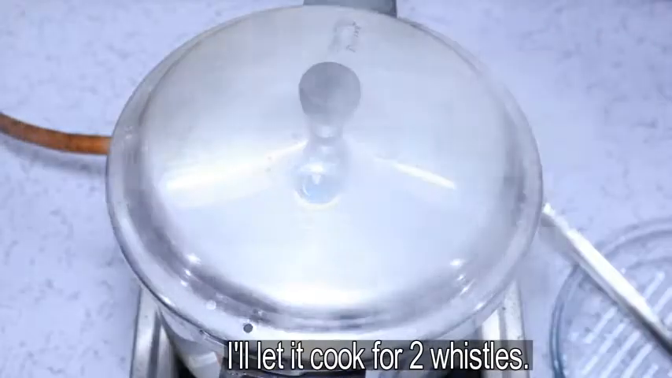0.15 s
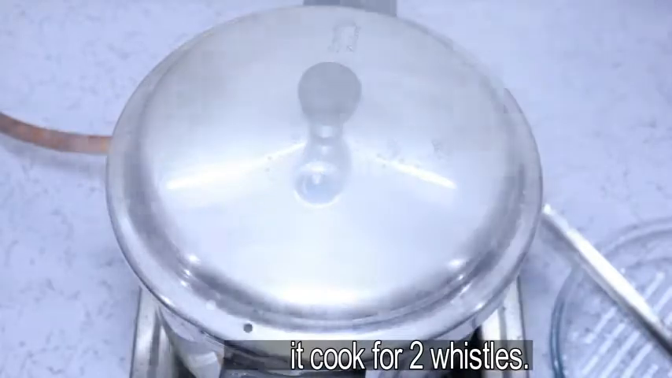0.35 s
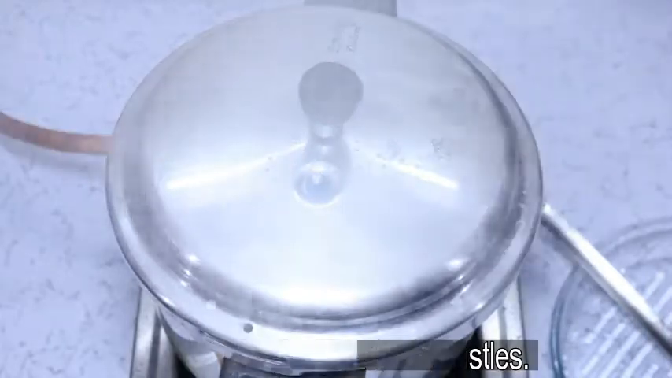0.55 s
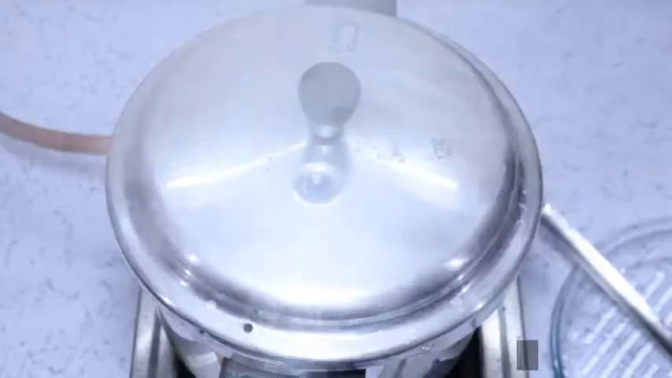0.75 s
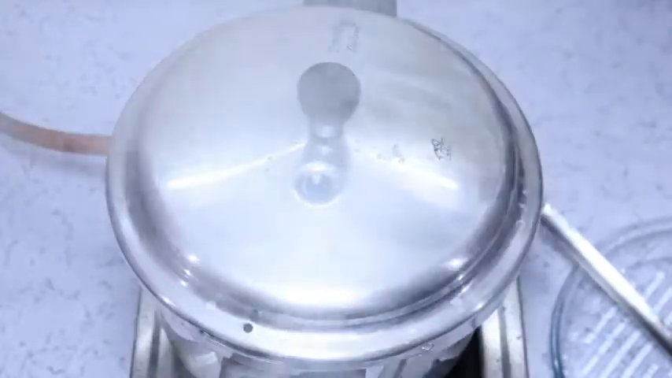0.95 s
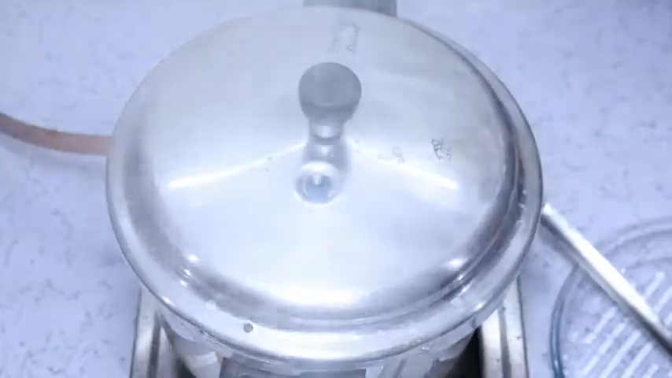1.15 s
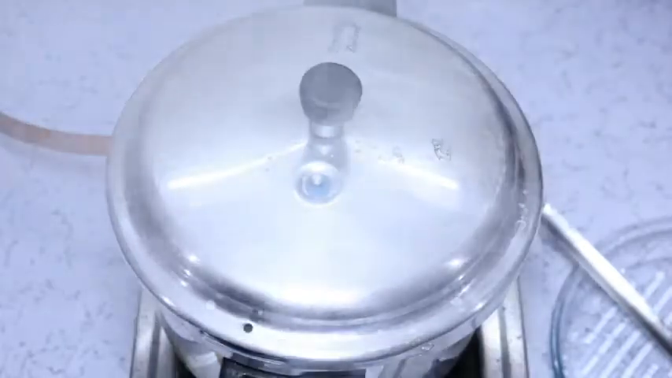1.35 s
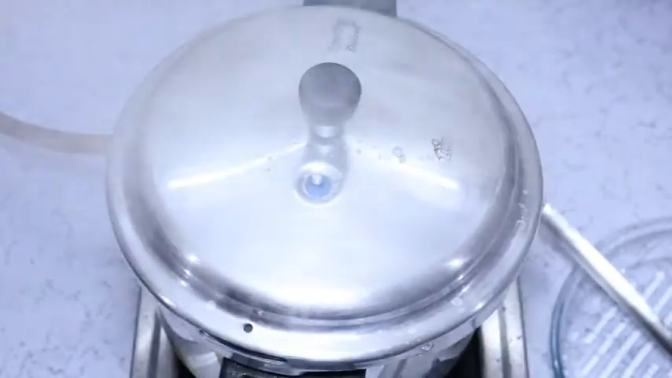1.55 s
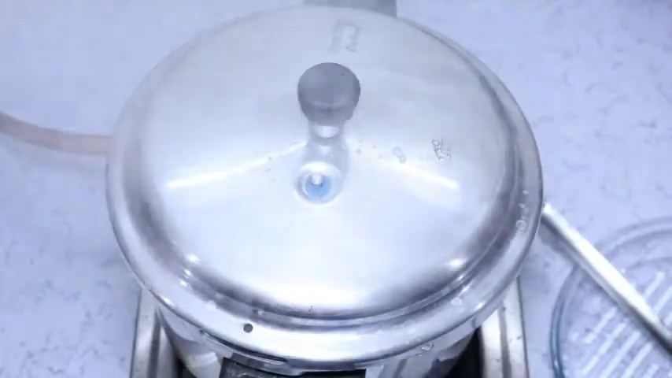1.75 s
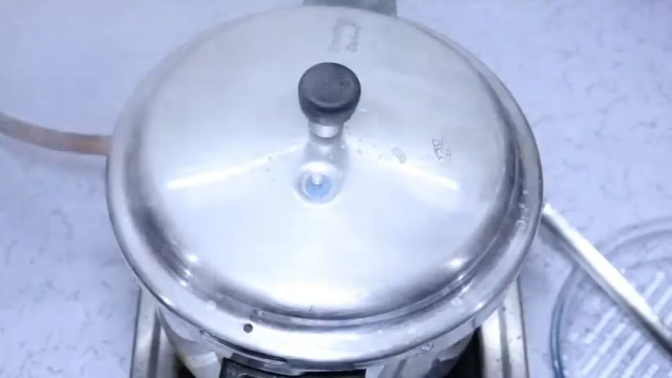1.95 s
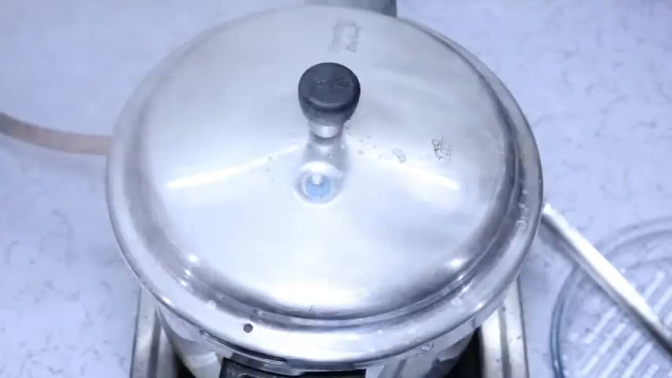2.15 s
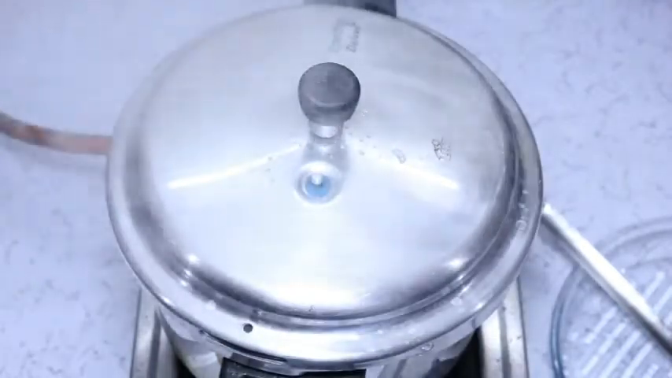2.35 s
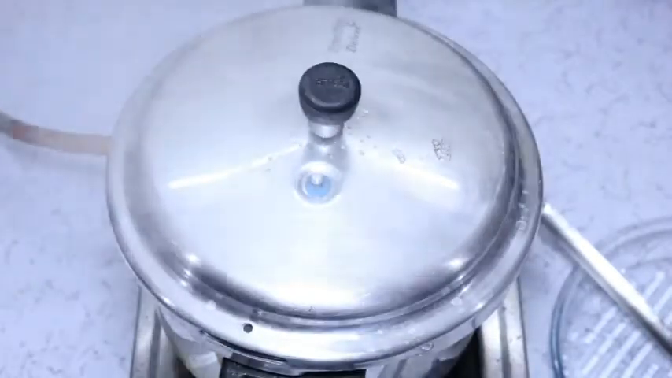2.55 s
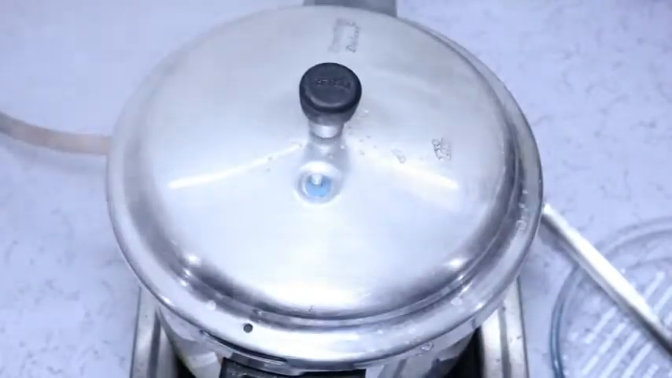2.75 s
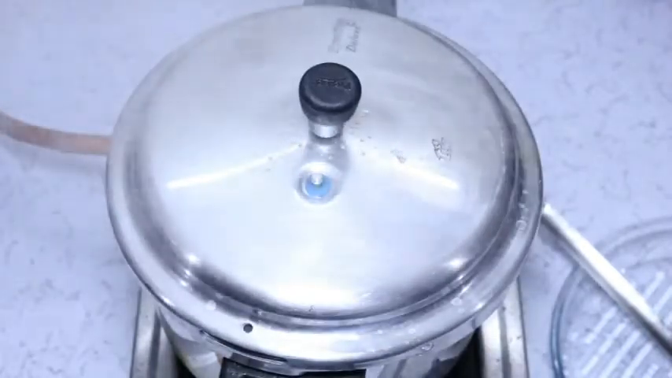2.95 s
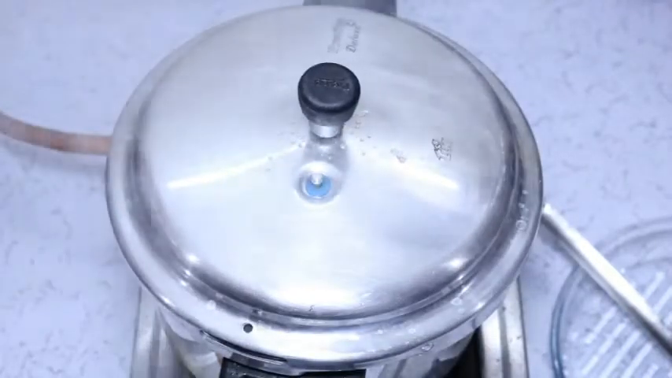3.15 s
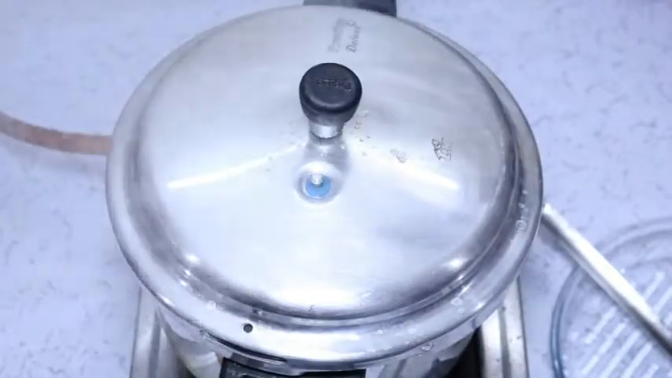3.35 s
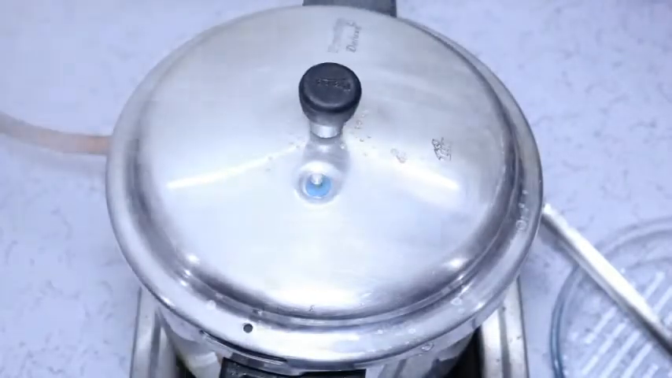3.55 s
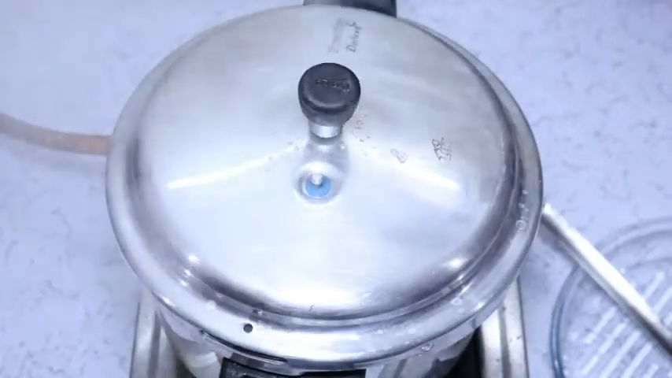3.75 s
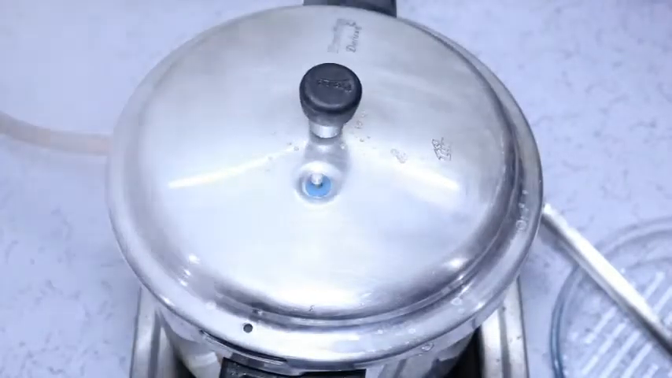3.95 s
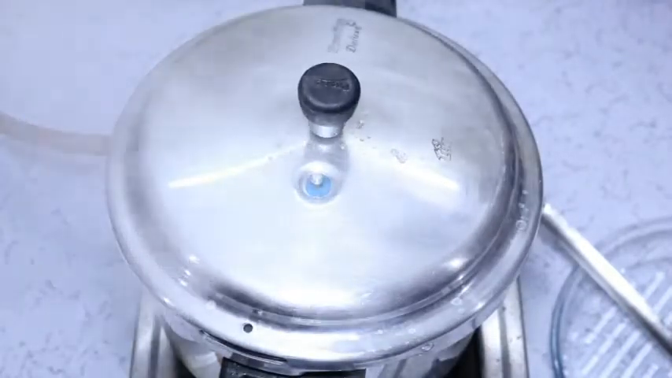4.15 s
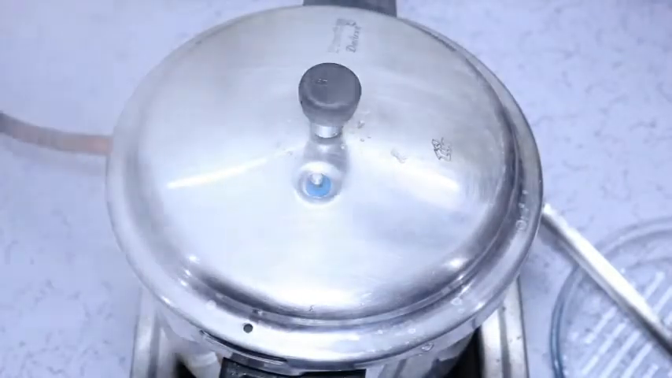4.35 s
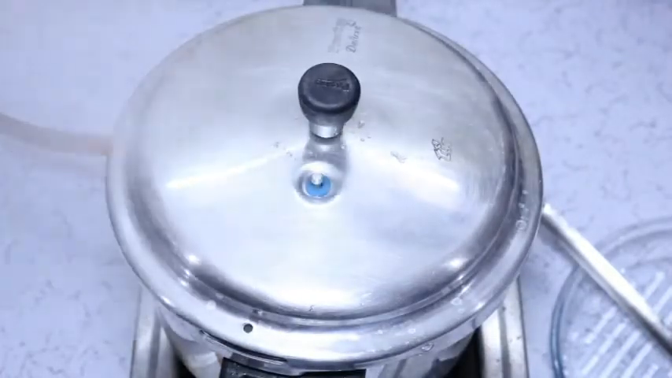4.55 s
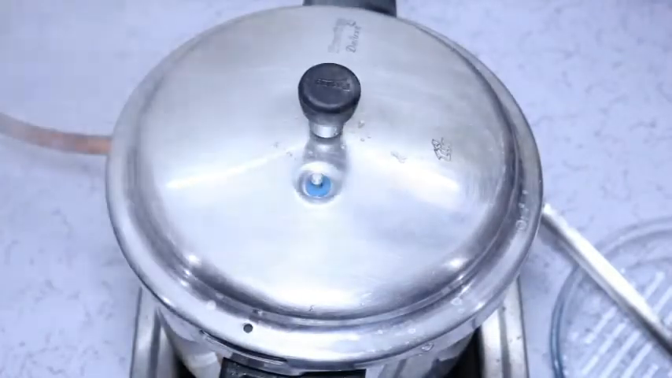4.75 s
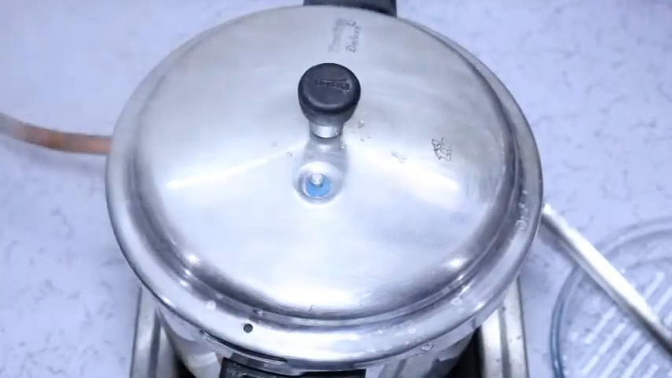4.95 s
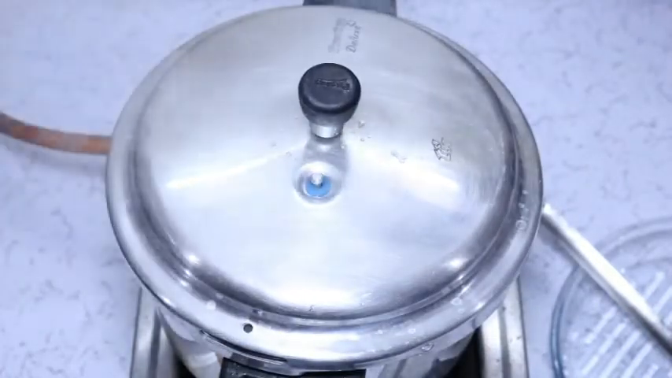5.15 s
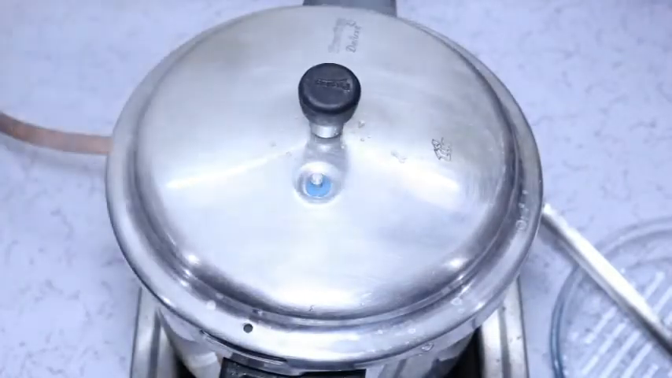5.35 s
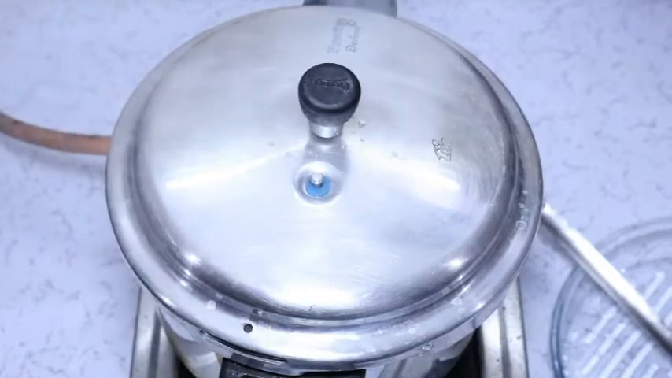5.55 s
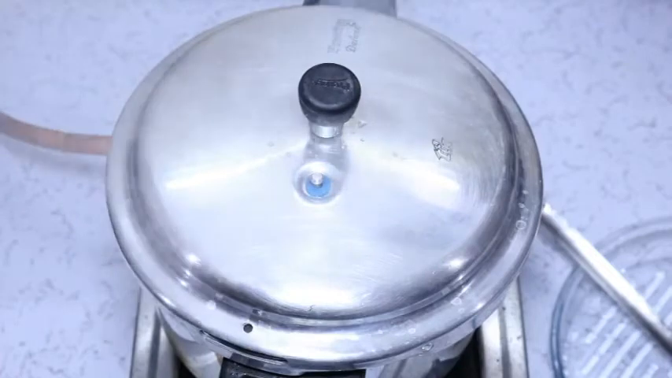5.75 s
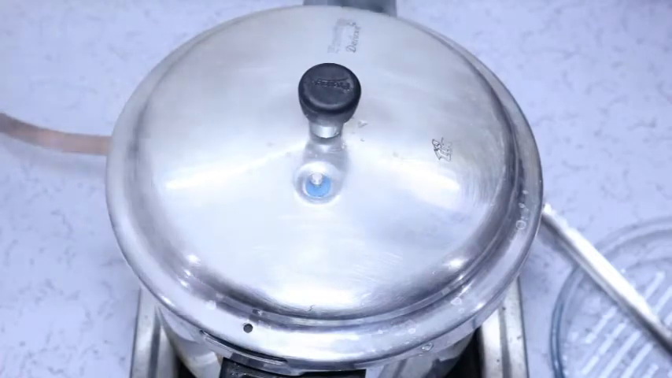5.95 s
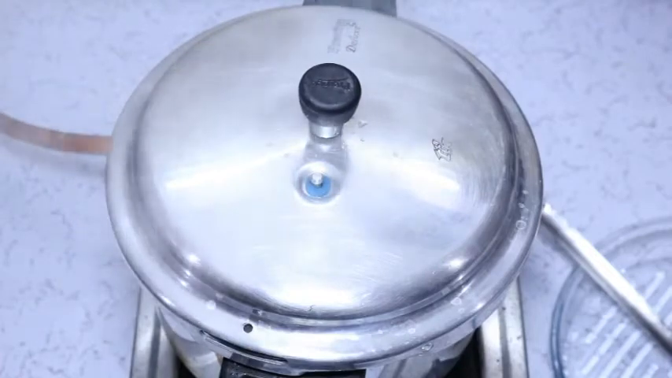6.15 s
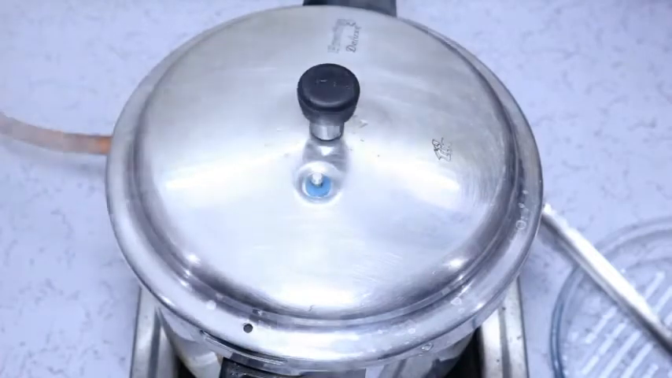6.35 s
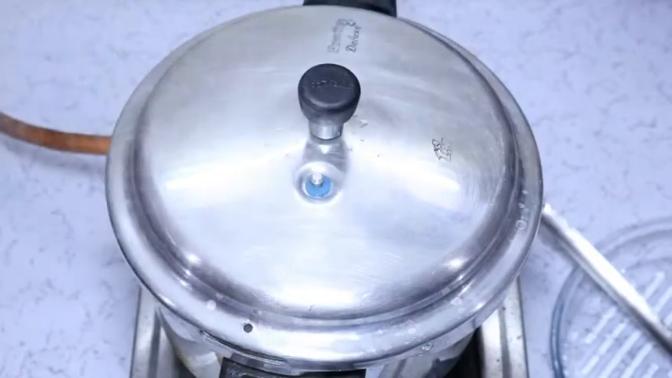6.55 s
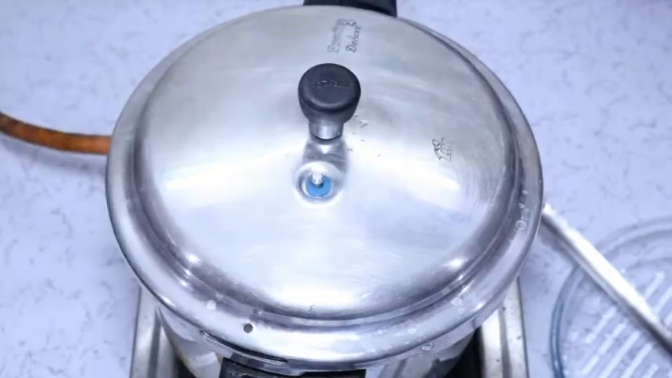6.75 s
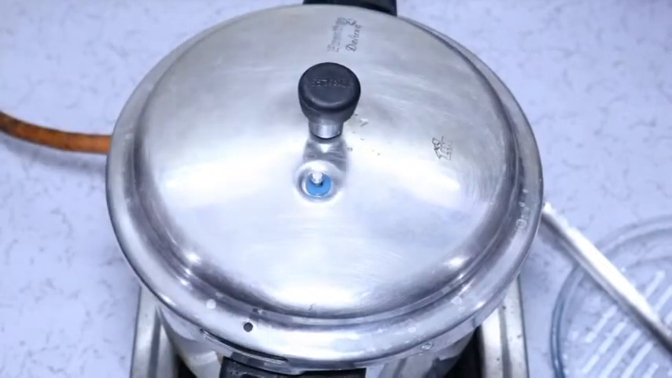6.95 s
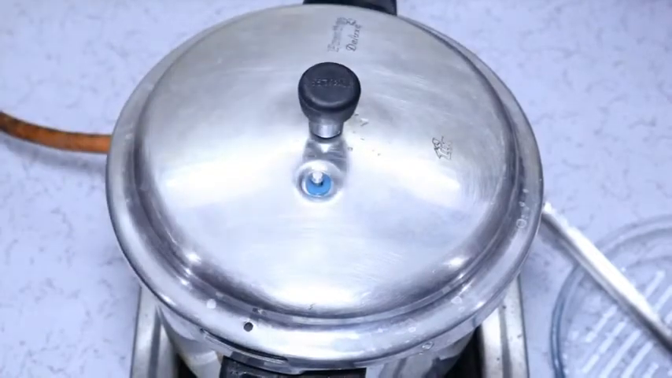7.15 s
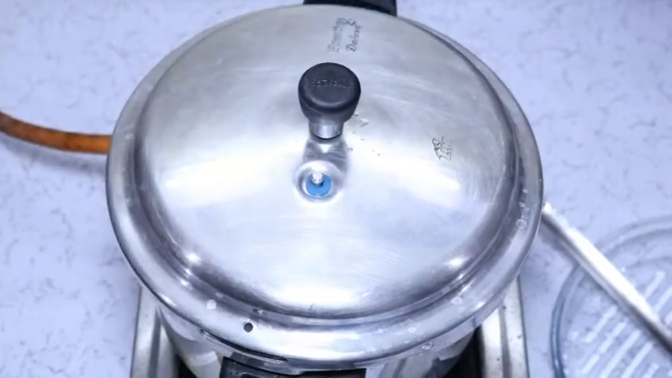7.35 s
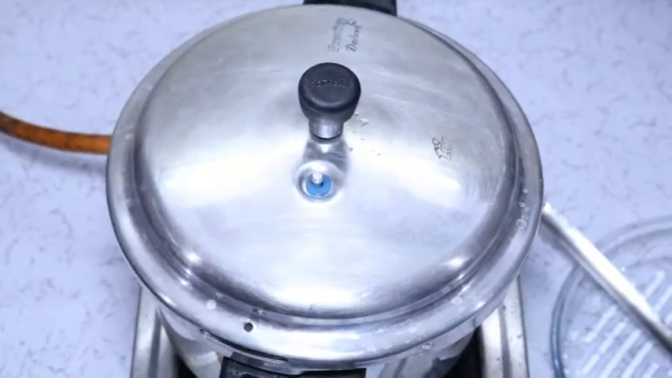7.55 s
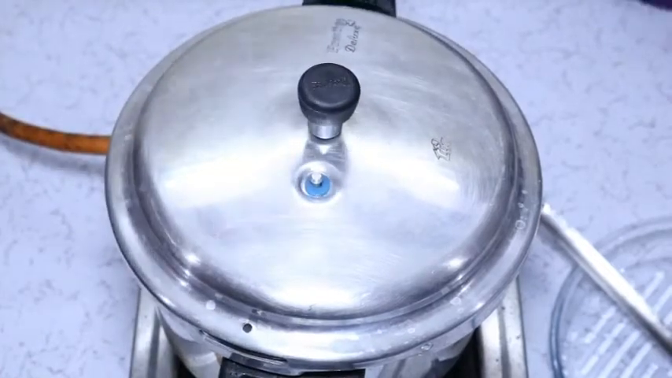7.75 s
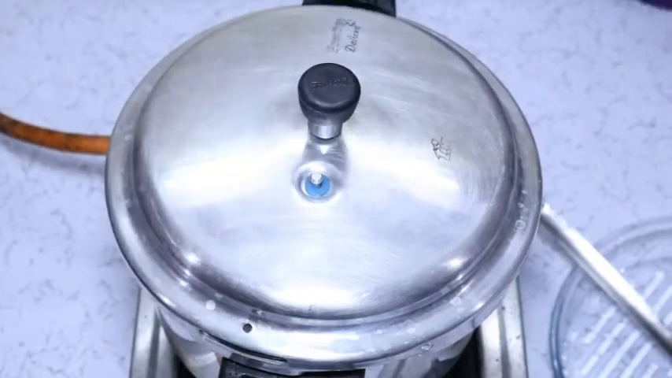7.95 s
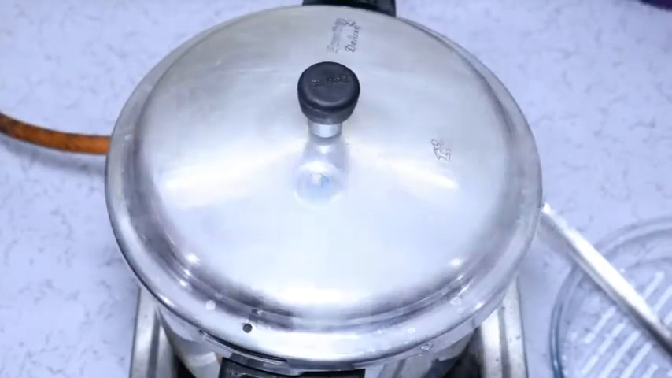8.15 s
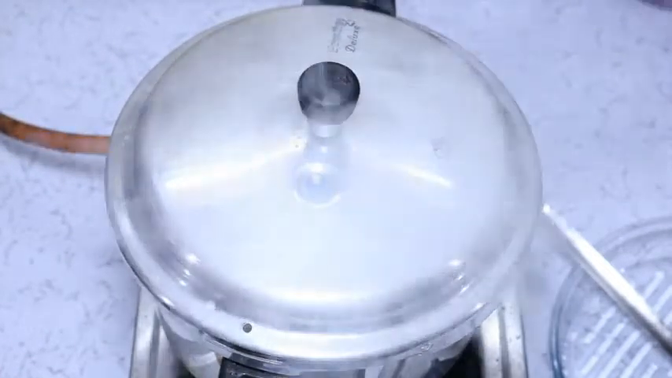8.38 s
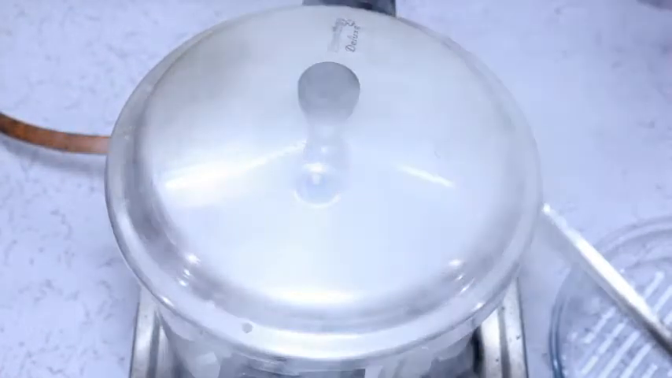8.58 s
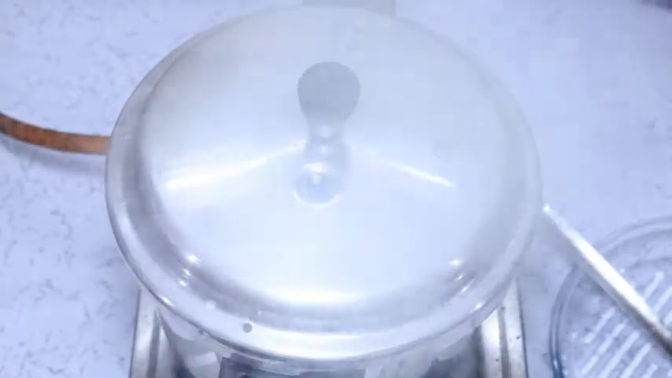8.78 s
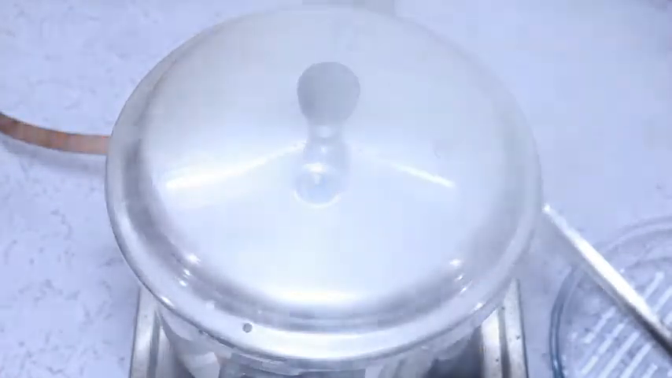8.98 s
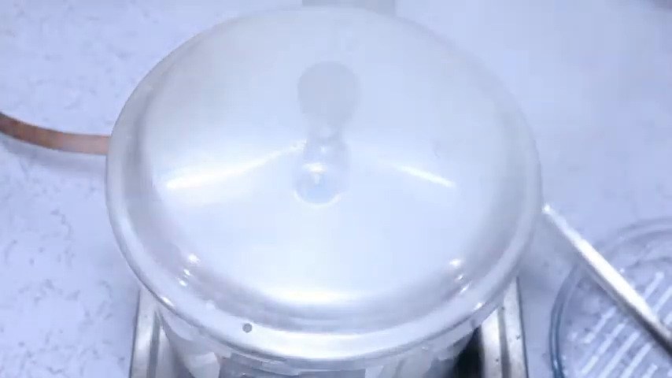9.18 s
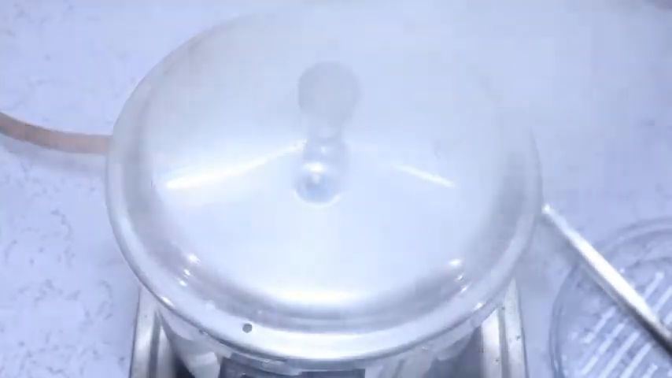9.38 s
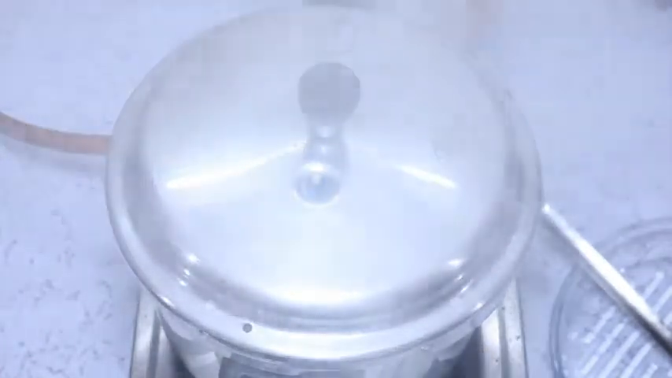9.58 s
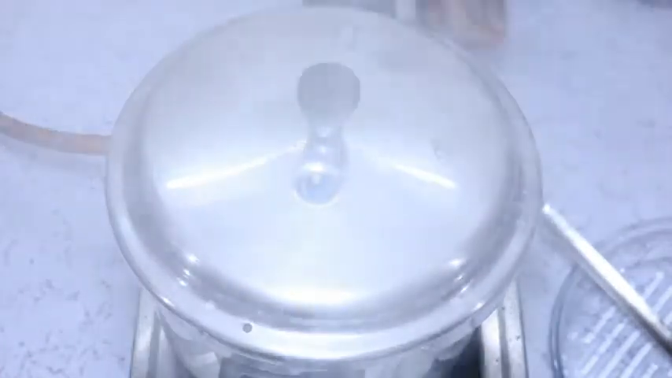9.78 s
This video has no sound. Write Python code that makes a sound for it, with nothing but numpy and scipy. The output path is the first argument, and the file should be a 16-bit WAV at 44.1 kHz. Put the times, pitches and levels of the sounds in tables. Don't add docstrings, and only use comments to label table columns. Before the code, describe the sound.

Pressure cooker steam blasts loudly and unevenly over a faint fan hum, rattles shut to a thin seep, then after a brief silence blasts again.

```python
import sys
import numpy as np
from scipy import signal
from scipy.fft import rfft, irfft, next_fast_len
from scipy.io import wavfile
from scipy.ndimage import uniform_filter1d

SR = 44100
rng = np.random.default_rng(int(sys.argv[2]) if len(sys.argv) > 2 else 0)


def magnitude_from_level(level_db):
    exponent = np.asarray(level_db, float) / 20
    return 10 ** exponent


def log_audio(samples):
    frames = np.atleast_2d(samples).T
    limited = np.clip(frames, -1, 1)
    pcm = np.round(limited * 32767).astype(np.int16)
    wavfile.write(sys.argv[1], SR, pcm)


N = 433062
TIME = np.arange(N) / SR
SIZE = next_fast_len(N)
HZ = np.maximum(np.fft.rfftfreq(SIZE, 1 / SR), 1)


def rms_one(x):
    return x / np.sqrt(np.mean(x ** 2) + 1e-20)


def at_hz(points):
    hz, db = np.array(points).T
    return np.interp(np.log(HZ), np.log(hz), db)


def drift(rate_hz):
    step = 40
    r = np.exp(-2 * np.pi * rate_hz * step / SR)
    noise = rng.standard_normal(N // step + 2002)
    slow = signal.lfilter([1], [1, -2 * r, r * r], noise)[2000:]
    return np.interp(np.arange(N) / step, np.arange(len(slow)), rms_one(slow))


# frequency in Hz, level in dB rms, wander in dB.
FAN_HUM = [(63.8, -70, 4), (127.7, -54, 1.2), (160, -60.5, 0.5), (245, -71, 1.5)]
# frequency in Hz, density in dB per Hz.
FAN_RUMBLE = [(25, -13), (60, -21), (100, -5), (125, -1), (165, 0), (200, -13.5), (300, -13), (500, -31)]


def fan():
    hum = np.zeros(N)
    for hz, db, wander_db in FAN_HUM:
        level = np.sqrt(2) * magnitude_from_level(db + wander_db * drift(2.2))
        hum += level * np.sin(2 * np.pi * hz * TIME + 0.3 * drift(1.7))
    spectrum = rfft(rng.standard_normal(SIZE)) * magnitude_from_level(at_hz(FAN_RUMBLE)) * (HZ < 600)
    return hum + magnitude_from_level(-56.5) * rms_one(irfft(spectrum, SIZE)[:N])


def strike(hits, modes, rub_s):
    at_s, peak_db = np.transpose(hits)
    spread_db = rng.normal(0, 2.6, (len(hits), len(modes)))
    out, grit = np.zeros(N), rng.standard_normal(N)
    contact = np.hanning(int(rub_s * SR) + 3)
    contact /= np.sqrt(np.sum(contact ** 2))
    heard = slice(int((at_s.min() - 0.1) * SR), int((at_s.max() + 0.5) * SR))
    for k, (hz, level_db, t60_s) in enumerate(modes):
        clicks = np.zeros(N)
        clicks[(at_s * SR).astype(int)] = magnitude_from_level(peak_db + level_db + spread_db[:, k])
        rub = signal.oaconvolve(clicks[heard], contact, "same") * grit[heard] + 1e-18
        r, w = magnitude_from_level(-60 / (t60_s * SR)), 2 * np.pi * hz / SR
        out[heard] += signal.lfilter([0.5, 0, -0.5], [1, -2 * r * np.cos(w), r * r], rub)
    return out


# centre in seconds, peak in dB.
BUMP_HITS = [
    (4.9, -40),
    (4.925, -38.5),
    (4.95, -48),
    (4.99, -50),
]
# frequency in Hz, level in dB, t60 in seconds.
CUPBOARD_MODES = [(326, -2, 0.26), (349, -5, .15), (431, 2, 0.17), (522, -4, 0.12), (650, 1, .1)]


def cupboard_bump():
    return strike(BUMP_HITS, CUPBOARD_MODES, rub_s=0.039)


# centre in seconds, peak in dB.
RATTLE_HITS = [(6.296, -39), (6.318, -33), (6.344, -30), (6.362, -34), (6.377, -33), (6.397, -32),
               (6.41, -37), (6.424, -35), (6.439, -40), (6.452, -47), (6.479, -41)]
# frequency in Hz, level in dB, t60 in seconds.
WEIGHT_MODES = [(508, -19, 0.076), (704, -10, 0.054), (930, -4, .06), (980, 0.5, 0.04), (1405, -4, .06)]
# centre in seconds, peak in dB.
TICK_HITS = [
    (6.379, -25.5),
    (6.478, -44),
]
# frequency in Hz, level in dB, t60 in seconds.
STEM_MODES = [(2050, -18, .02), (2700, -16, .1), (3600, 0, .025), (3950, 3, .025), (6200, -12, .015)]


def seating_rattle():
    grind = strike(RATTLE_HITS, WEIGHT_MODES, rub_s=0.019)
    return grind + strike(TICK_HITS, STEM_MODES, rub_s=0.003)


# centre in seconds, peak in dB.
LIFT_HITS = [
    (8.058, -43),
    (8.085, -45),
    (8.11, -49),
    (8.135, -51),
]
# frequency in Hz, level in dB, t60 in seconds.
POT_MODES = [(380, -15, 0.07), (474, 1.5, .07), (577, 2.5, .05), (950, 0, .04), (1500, 4, 0.089)]


def lift_knock():
    return strike(LIFT_HITS, POT_MODES, rub_s=0.022)


# centre in seconds, peak in dB.
FLARE_HITS = [
    (.62, -36),
    (.67, -31),
    (1.08, -36),
    (1.29, -21),
    (1.45, -32),
    (2.5, -34),
    (2.8, -32),
]
# frequency in Hz, level in dB, t60 in seconds.
VENT_MODES = [(1950, 4, .03), (2380, 10, .04)]


def vent_flares():
    return strike(FLARE_HITS, VENT_MODES, rub_s=0.05)


# frequency in Hz, width in Hz, gain in dB.
LID_ECHOES = [(1705, 290, 2), (2490, 240, 3.5), (3220, 470, -2), (3430, 170, -0.5), (4630, 220, 1.5),
              (4170, 170, 0.5), (5070, 160, -2), (5720, 240, 3), (6870, 340, 0), (7280, 170, 1.5),
              (7500, 400, 0), (8300, 150, -3.5), (9170, 340, 2), (10100, 300, 0.5), (11960, 490, 3.5),
              (13400, 500, 2.5)]
# frequency in Hz, width in Hz, gain in dB.
TUBE_RINGS = [(1493, 14, 4.5), (1840, 38, 2), (2190, 40, 2), (2700, 31, 1.5), (3053, 40, 5.5),
              (3180, 37, 1.5), (3260, 20, 5.5), (3470, 27, 6.5), (4100, 35, 0.5), (5060, 45, 2),
              (7620, 50, 3)]


def turbulence(colour):
    lid_db = sum(db / (1 + (2 * (HZ - hz) / width_hz) ** 2) for hz, width_hz, db in LID_ECHOES + TUBE_RINGS)
    spectrum = rfft(rng.standard_normal(SIZE)) * magnitude_from_level(at_hz(colour) + lid_db)
    core = (HZ > 2600) & (HZ < 5500)
    return spectrum * SIZE / np.sqrt(2 * np.sum(np.abs(spectrum[core]) ** 2))


# frequency in Hz, density in dB per Hz.
LEAK_SPECTRA = [
    [(260, -17.5), (450, -3), (477, -18), (506, -10.5), (774, -6.5), (1280, -9), (1610, -6.5), (3120, -5),
     (3670, -1), (4920, -8.5), (5780, -4), (8340, -10), (15000, -10.5)],
    [(18, -70), (30, -24), (208, -24), (334, -23.5), (469, -23), (594, -20), (1030, -16), (1210, -18),
     (1740, -9.5), (4350, -4.5), (4960, -7), (7350, -4.5), (13100, -10), (15700, -3)],
]


def leak(shot, level_db, top_hz):
    hiss = irfft(turbulence(LEAK_SPECTRA[shot]) * (HZ < top_hz), SIZE)[:N]
    return hiss * magnitude_from_level(level_db + 0.21 * drift(14))


def swells(rows):
    rise_share = 0.51
    coarse = TIME[::64]
    s, db, length_s = np.transpose(rows)[:, :, None]
    side_s = length_s * np.where(coarse < s, rise_share, 1 - rise_share)
    phase = np.clip((coarse - s) / side_s, -1, 1)
    return np.interp(TIME, coarse, np.sum(db * np.cos(np.pi / 2 * phase) ** 2, axis=0))


# time in seconds, core level in dB, brightness in dB.
VALVE_PRESSURE = [
    [(0.0, -21, -1), (0.8, -21.5, -0.5), (1.6, -21.5, -4), (3.1, -24.5, 1.5), (5.3, -24, -1),
     (6.24, -25.5, -1), (6.325, -33.5, 5), (6.5, -63, -9), (6.62, -87, 5)],
    [(8.02, -43, -2), (8.04, -41, 9), (8.07, -24, 2.5), (8.2, -20.5, 0.5), (8.6, -21, 1), (9.0, -21, 1.5),
     (9.82, -20.5, -1)],
]
# peak in seconds, rise in dB, length in seconds.
WEIGHT_TIPS = [
    [(0.09, 7.5, 0.075), (0.215, 9, 0.1), (0.37, 6, .08), (0.5, 4, .12), (0.62, 7.5, 0.053),
     (0.81, 6.5, 0.11), (0.93, 4.5, 0.12), (1.11, 3, 0.13), (1.27, 3, 0.15), (1.43, 3, 0.22),
     (1.61, 5, 0.15), (1.75, 6.5, .12), (1.9, 9.5, 0.048), (2.13, 2, .12), (2.31, 3, 0.12),
     (2.5, 4.5, 0.21), (2.7, 3.5, 0.28), (2.81, 6, 0.072), (4.2, 3, .1), (4.6, 3, .14), (4.75, 2.5, 0.32),
     (5.03, 4, .1), (5.3, 3, 0.67), (5.75, 1.5, 1)],
    [(8.075, 3.5, 0.04), (8.16, 9, 0.12), (8.22, 5, .1), (8.3, 0.5, .12), (8.39, 4.5, 0.15), (8.48, 4, .1),
     (8.72, 4.5, 0.19), (8.905, 7, .06), (8.985, 8.5, .12), (9.12, 10, 0.089), (9.255, 6.5, 0.11),
     (9.41, 10.5, 0.066), (9.59, 10, 0.081), (9.76, 4, 0.05)],
]
# peak in seconds, rise in dB, length in seconds.
JET_SWINGS = [
    [(0.13, 1, .14), (0.27, 2.5, 0.18), (0.63, 2.2, 0.26), (0.97, 2, 0.12), (1.3, 0, 0.1),
     (1.82, 1.5, 0.087), (2.2, 2, 0.39), (2.95, 3, 0.31), (3.22, 3, 0.23), (3.57, 4, 0.23), (3.86, 5, 0.23),
     (4.24, 4, 0.14), (4.32, 3.5, .1), (4.63, 2, 0.22), (5.0, 1.5, 0.12), (5.47, 1.5, 0.45),
     (5.75, 1.5, 0.44)],
    [(8.075, 4, .05), (8.42, 3.5, 0.11), (8.71, 3.5, 0.1), (9.01, 0.5, .14), (9.3, 2.5, 0.051),
     (9.45, 1.5, .2), (9.63, 1.5, .15)],
]
# peak in seconds, rise in dB, length in seconds.
GAP_PINCHES = [
    [(0.12, 4, .12), (0.36, 1.5, .1), (0.94, 2, .12), (1.225, 2, .1), (1.54, 1, .07), (1.7, 2.5, .1),
     (2.34, 3.5, .16), (2.56, 1, .14), (2.87, 1.5, .16), (3.1, 3.5, 0.093), (3.27, 0.5, 0.17),
     (3.69, 2.5, .14), (4.05, 2.5, .16), (4.41, 1.5, 0.57), (5.1, 3, .2), (5.47, 0.5, .14), (5.72, 4, 0.13),
     (6.0, 3, .2), (6.41, -10, 0.15), (6.52, 14, .1)],
    [(8.54, 2.5, .18), (8.76, 4.5, .2), (9.21, 3.5, .3), (9.57, 1.5, .1)],
]
PUFF_GAINS = (0.58, 0.0, 0.93, 0.68, 0.0)
CORE_GAINS = (0.97, 0.014, 0.12, 0.71, 0.0)
EDGE_GAINS = (1.0, 0.56, 0.0, 0.084, 0.13)
FINE_GAINS = (0.85, 0.96, 0.0, -0.043, 0.77)


def jet_levels(shot, lifts_db):
    full_db = -21.5
    s, core_db, bright_db = np.transpose(VALVE_PRESSURE[shot])
    controls = [np.interp(TIME, s, core_db - full_db, -200, -200),
                np.interp(TIME, s, bright_db),
                swells(WEIGHT_TIPS[shot]), swells(JET_SWINGS[shot]), swells(GAP_PINCHES[shot])]
    gains = np.array([PUFF_GAINS, CORE_GAINS, EDGE_GAINS, FINE_GAINS])
    return full_db + gains @ controls + np.array(lifts_db)[:, None]


def eddies(x, depth_db):
    cells = signal.stft(x, nperseg=512)[2]
    spots = uniform_filter1d(rng.standard_normal(cells.shape), size=3, axis=0)
    spots = uniform_filter1d(spots, size=5, axis=1)
    return signal.istft(cells * magnitude_from_level(depth_db * rms_one(spots)), nperseg=512)[1][:N]


# frequency in Hz, density in dB per Hz.
BURST_SPECTRA = [
    [(150, -61), (250, -32), (915, -15.0), (1250, -14.5), (1700, -7.5), (2540, -4.5), (3180, -2.5), (3520, 0.5), (6570, -8.5), (7680, -2.5), (9950, -13), (11800, -7.5), (15600, -7.0)] + [(15900, -7)],
    [(30, -36), (170, -39), (900, -16.5), (1210, -14.5), (1700, -7), (2600, -4), (3620, -.5), (4500, -2), (5300, -7), (6600, -8), (7540, -5), (9800, -13), (12100, -8.5), (15700, -7.5)],
]


def burst(shot, lifts_db, patchy_db, flutter_db, eddy_db):
    levels = jet_levels(shot, lifts_db)
    spectrum, out, flutter = turbulence(BURST_SPECTRA[shot]), np.zeros(N), drift(25)
    blowing = np.flatnonzero(levels[1] > -150)
    on = slice(max(blowing[0] - SR // 8, 0), blowing[-1] + SR // 8)
    levels = levels[:, on]
    place = np.clip(np.log2(HZ / 500) * 2.5, 0, 13)
    for k in range(14):
        share = np.clip(1 - np.abs(place - k), 0, 1)
        zone = np.interp(500 * 2 ** (k / 2.5), [2000, 2950, 5000, 7000, 9000, 12000], [0, 1, 1, 2, 2, 3])
        level_db = np.clip(1 - np.abs(zone - np.arange(4)), 0, 1) @ levels
        if k < 2:
            smooth_db = uniform_filter1d(np.maximum(level_db, -50), size=SR // 6)
            level_db = np.minimum(level_db + 6, smooth_db)
        patches_db = patchy_db * drift(5.5) + flutter_db * flutter
        out[on] += irfft(spectrum * share, SIZE)[:N][on] * magnitude_from_level(level_db + patches_db[on])
    return eddies(out, eddy_db)


def kitchen(x):
    t60_s, tail_db = 0.39, -9.5
    age_s = np.arange(SR // 2) / SR
    tail = rng.standard_normal(len(age_s)) * magnitude_from_level(-60 * age_s / t60_s) * (age_s > 0.004)
    tail *= magnitude_from_level(tail_db) / np.sqrt(np.sum(tail ** 2))
    return (x + signal.fftconvolve(x, tail)[:N]) / np.sqrt(1 + magnitude_from_level(2 * tail_db))


def scene():
    silence_start_s, silence_end_s = 7.588, 7.669
    before = burst(0, lifts_db=(-2.5, 0.0, 1.0, -0.5), patchy_db=0.5, flutter_db=0.5, eddy_db=1.04)
    before += leak(0, level_db=-52, top_hz=15050)
    before += cupboard_bump() + seating_rattle() + vent_flares()
    after = burst(1, lifts_db=(-2.5, 0.0, 0.3, -0.5), patchy_db=-0.3, flutter_db=0.64, eddy_db=1.37)
    after += leak(1, level_db=-36, top_hz=SR / 2) + lift_knock()
    fade_out = np.clip((silence_start_s - TIME) / 0.0018, 0, 1)
    fade_in = np.clip((TIME - silence_end_s) / 0.004, 0, 1)
    return np.tile((kitchen(before) + fan()) * fade_out + kitchen(after) * fade_in, (2, 1))


# centre in seconds, low edge in Hz, high edge in Hz, side level in dB.
BRIEF_PATCHES = [(0.2, 8900, 10350, -4), (0.526, 8900, 10350, -2), (.732, 9600, 10900, 8),
                 (0.896, 5150, 6350, -1), (2.059, 4200, 5170, -2), (2.058, 9600, 11050, -1),
                 (2.5, 6200, 7600, -2), (2.895, 4150, 5750, -3), (3.08, 4130, 5200, -2),
                 (4.173, 6850, 8300, -1), (4.196, 4650, 5750, -4), (4.497, 6250, 7600, -2),
                 (5.727, 4600, 5750, -4), (5.96, 5700, 6900, -4), (5.958, 13750, 15800, -5),
                 (6.24, 6850, 8300, -2), (6.66, 4200, 5800, -5), (7.1, 5650, 6900, -4),
                 (9.768, 12350, 13800, -1)]
QUIET_PATCHES = [
    (7.0, 13500, 15000, -13),
    (7.0, 30, 960, -25),
]


def wide_patches(mid):
    side = np.zeros(N)
    patches = [(0.041, row) for row in BRIEF_PATCHES] + [(1.15, row) for row in QUIET_PATCHES]
    for length_s, (s, low_hz, high_hz, side_db) in patches:
        start, size = int((s - length_s / 2) * SR), int(length_s * SR)
        hz = np.fft.rfftfreq(size, 1 / SR)
        turn = np.exp(2j * np.pi * rng.random(len(hz))) * (hz > low_hz) * (hz < high_hz)
        patch = irfft(rfft(mid[start:start + size]) * turn, size)
        window = signal.windows.tukey(size, min(1, 0.055 / length_s))
        side[start:start + size] += magnitude_from_level(side_db) * patch * window
    return side


def top_cut(x):
    return signal.sosfilt(signal.butter(12, 17070, fs=SR, output="sos"), x)


def record(dry):
    cut = irfft(rfft(dry, SIZE) * magnitude_from_level(-0.35 * np.maximum(HZ - 15740, 0)), SIZE)[:, :N]
    mix = cut + wide_patches(cut[0]) * [[1], [-1]]
    return top_cut(mix)


dry = scene()
out = record(dry)
log_audio(out)
```